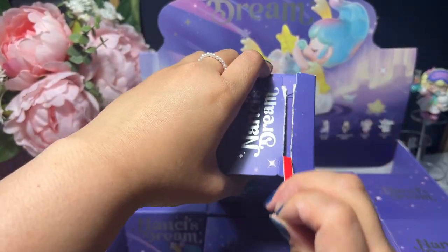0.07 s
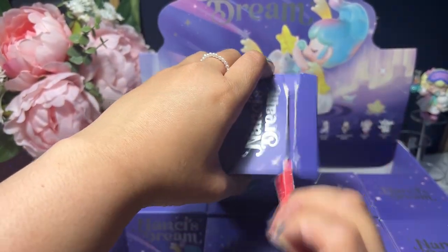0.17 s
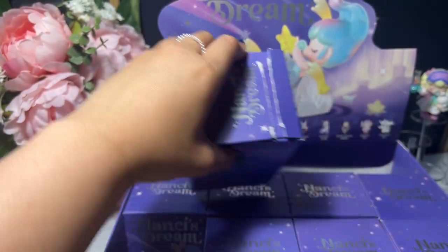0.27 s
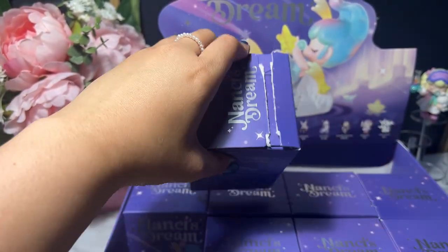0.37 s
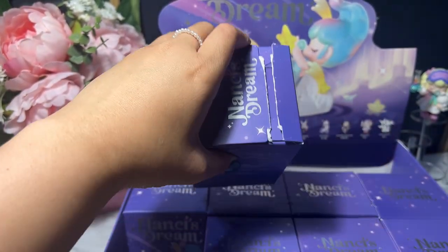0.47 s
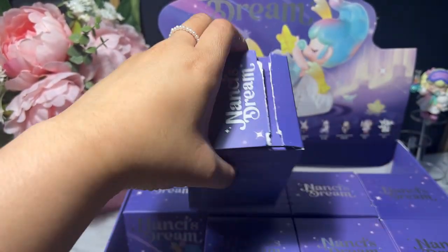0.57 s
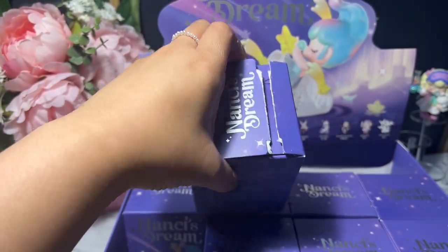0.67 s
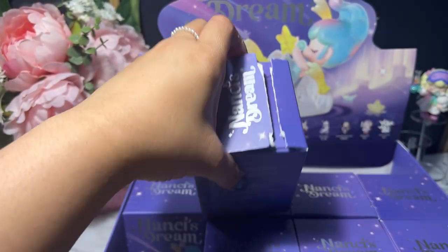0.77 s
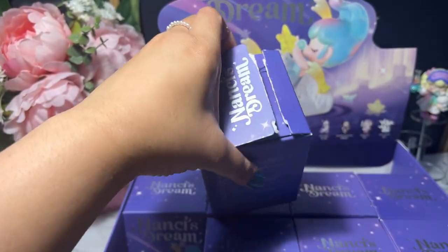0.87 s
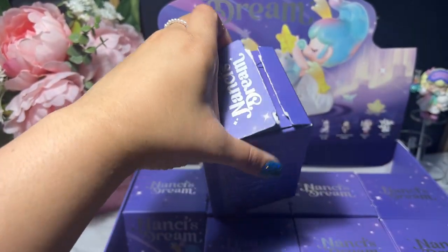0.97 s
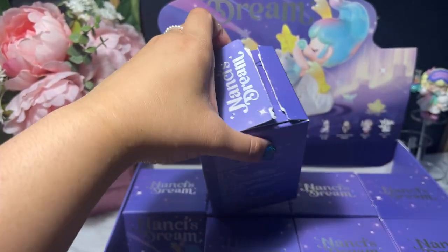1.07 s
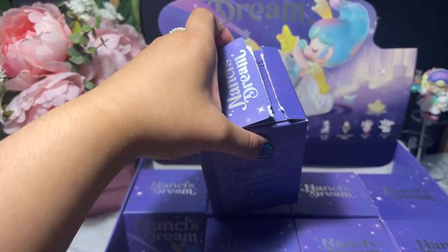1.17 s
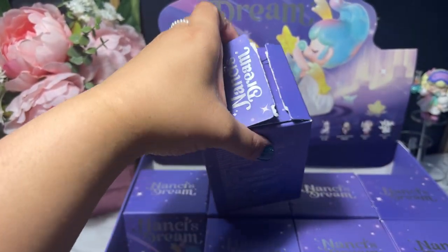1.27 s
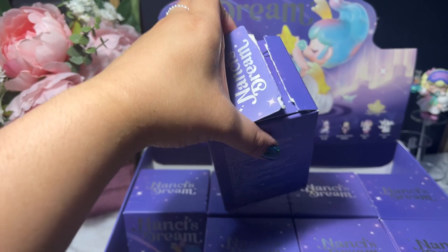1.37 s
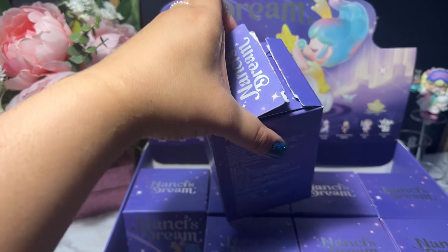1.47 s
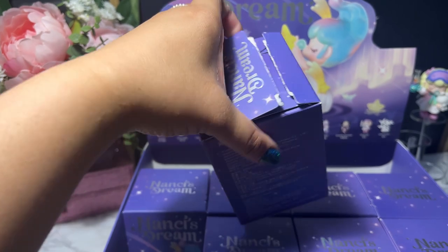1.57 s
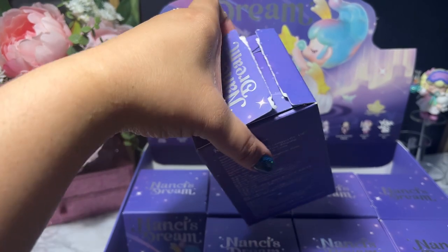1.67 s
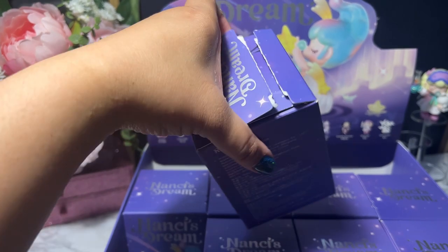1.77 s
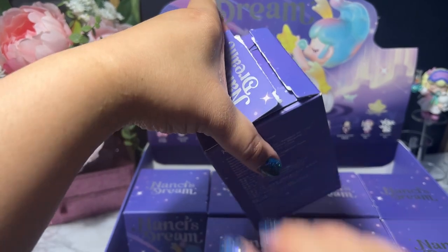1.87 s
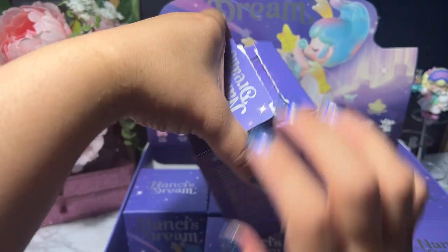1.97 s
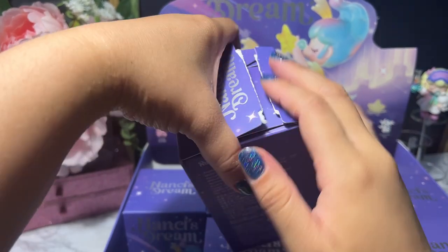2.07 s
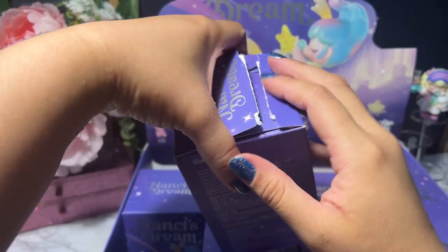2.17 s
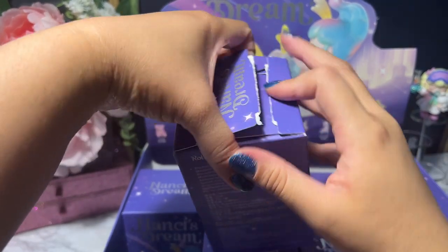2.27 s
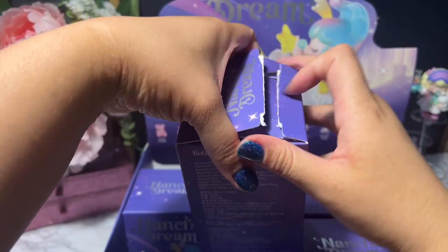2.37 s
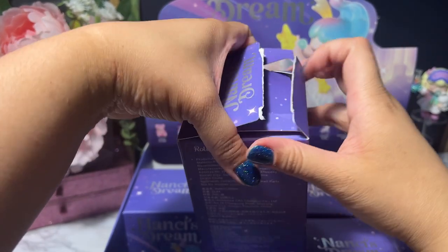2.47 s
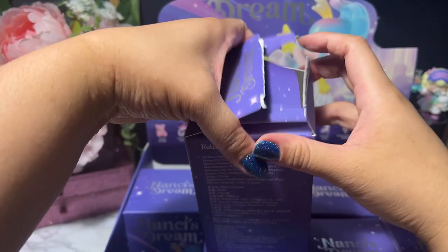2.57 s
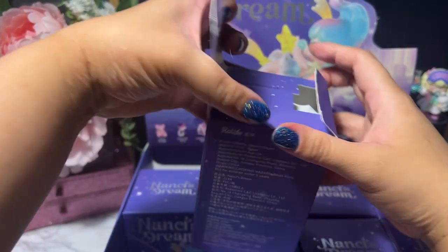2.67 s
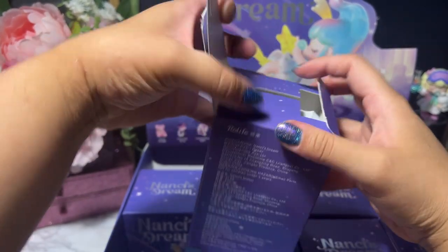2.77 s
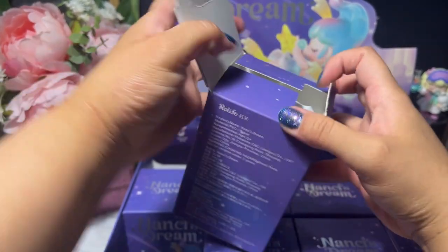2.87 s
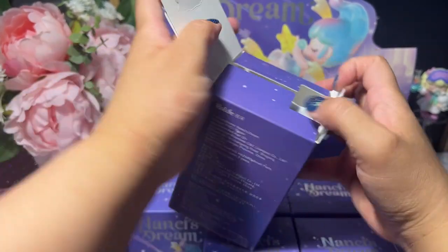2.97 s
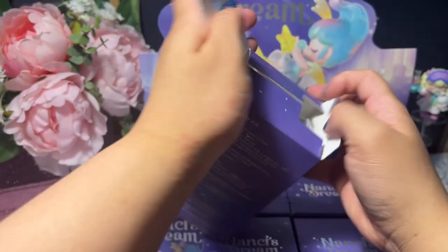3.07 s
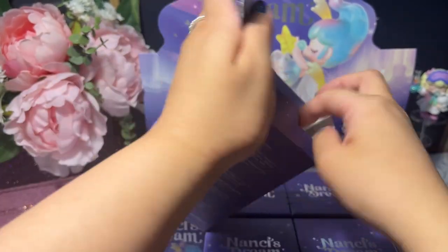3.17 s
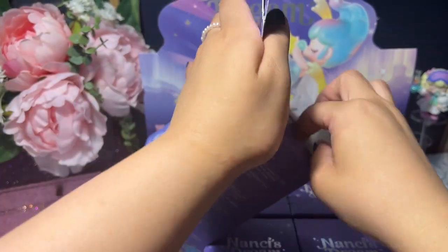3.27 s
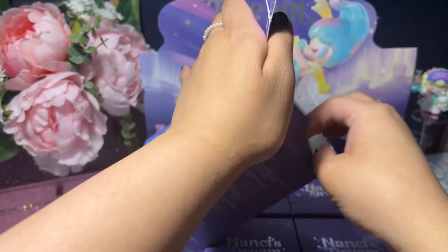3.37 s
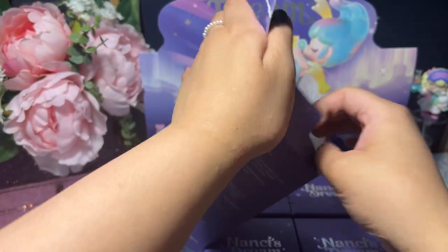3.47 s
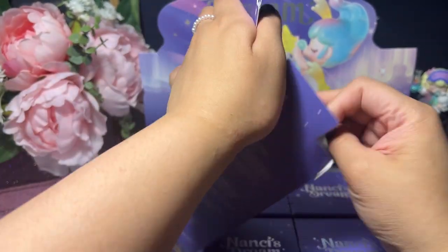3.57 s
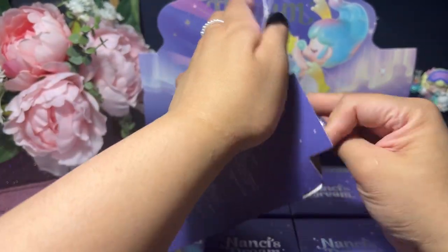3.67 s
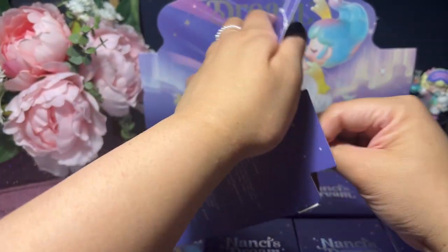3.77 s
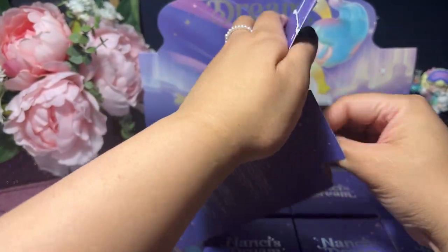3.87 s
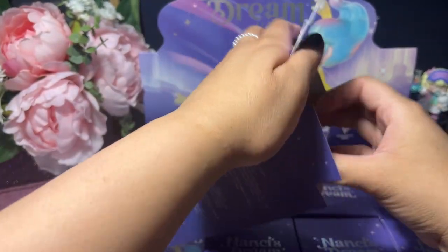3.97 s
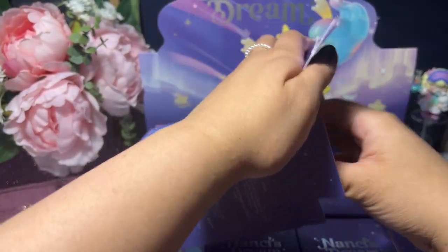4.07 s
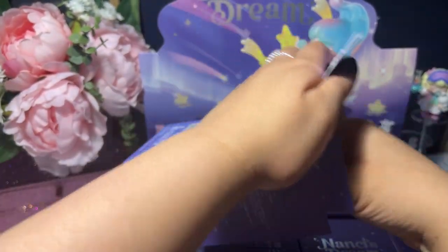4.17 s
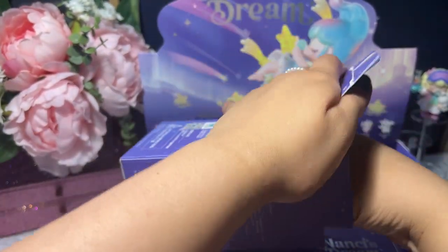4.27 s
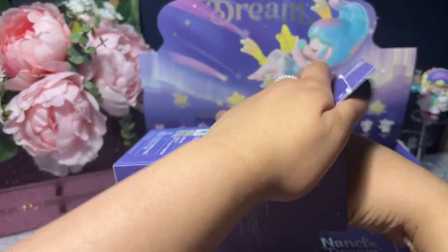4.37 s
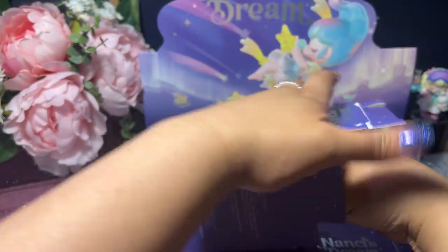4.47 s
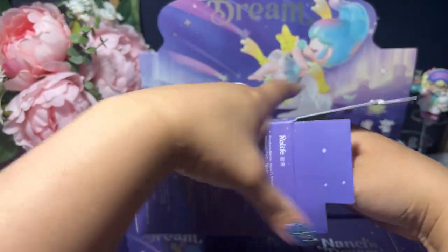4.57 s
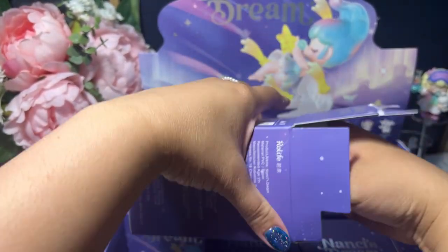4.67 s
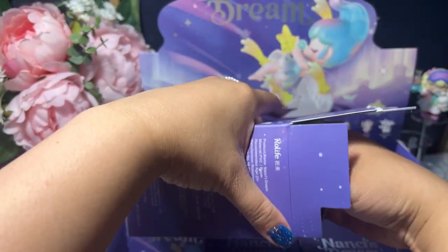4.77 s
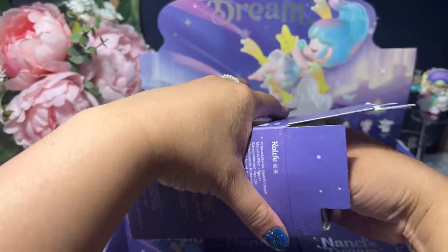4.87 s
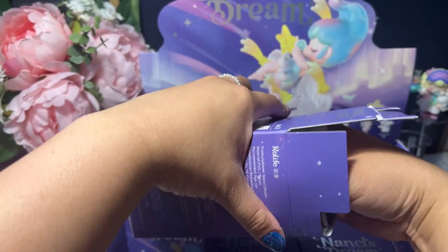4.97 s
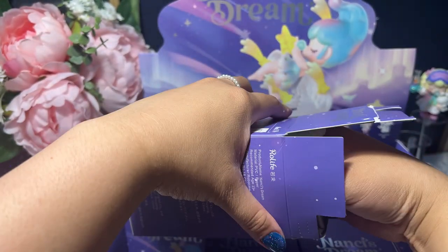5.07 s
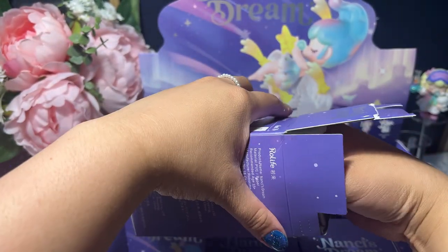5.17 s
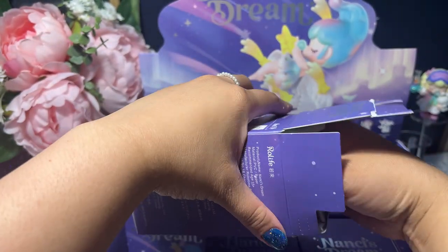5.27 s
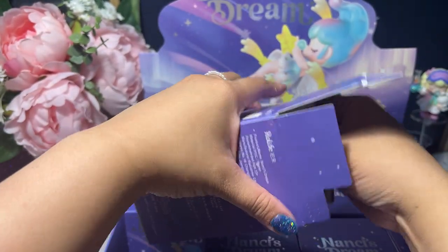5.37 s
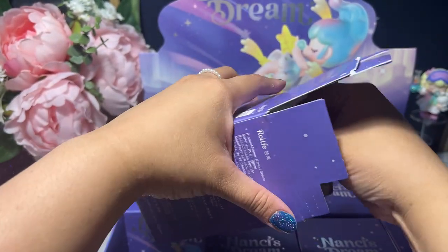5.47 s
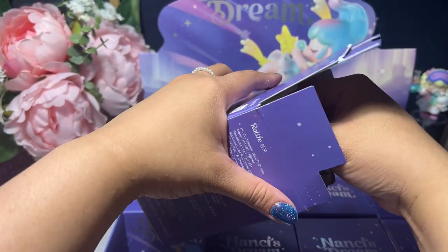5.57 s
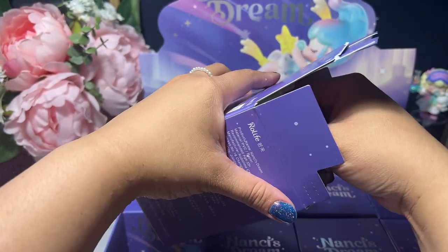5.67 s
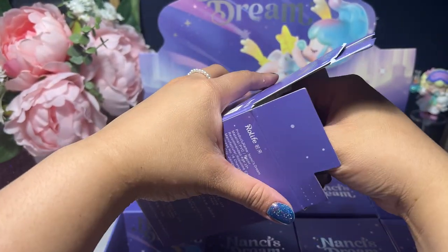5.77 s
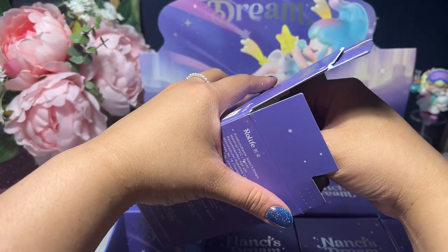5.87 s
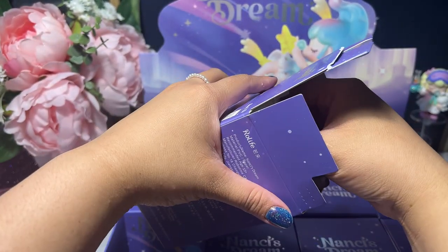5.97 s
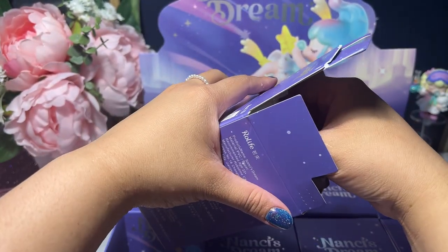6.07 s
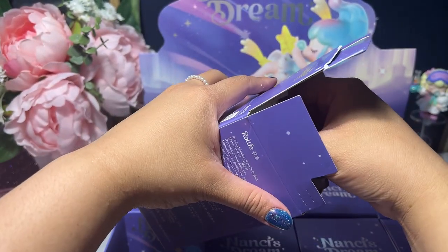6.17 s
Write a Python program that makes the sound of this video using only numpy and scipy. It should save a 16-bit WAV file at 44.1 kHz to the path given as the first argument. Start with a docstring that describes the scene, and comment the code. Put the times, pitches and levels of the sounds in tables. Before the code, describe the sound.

Sharp clicks of ripping card and hollow bumps as a small box is pulled open, building to a dense rustle in a quiet room.

```python
"""Opening a small card box

Hands pull a card box open close to the microphones in a quiet room. Glue seams and creases let go
in short bursts of cracks that ring the card walls and thin edges, and the box gives dull thumps.
In between, fingers rub and crackle on the card, and now and then a flicked tab pings.
Underneath are a low wobble of the table, a short room echo and steady room noise."""
import sys
import numpy as np
from scipy import signal
from scipy.fft import rfft, irfft, next_fast_len
from scipy.io import wavfile
from scipy.ndimage import uniform_filter1d, map_coordinates

SR = 44100
rng = np.random.default_rng(int(sys.argv[2]) if len(sys.argv) > 2 else 0)


def generate_wav(signal):
    """Clip the signal to [-1, 1] and save it as 16-bit WAV at the path in sys.argv[1]."""
    frames = np.transpose(np.atleast_2d(signal))
    scaled = np.clip(frames, -1, 1) * 32767
    pcm = np.round(scaled).astype(np.int16)
    wavfile.write(sys.argv[1], SR, pcm)


N = 273552  # length in samples, about 6.2 seconds

# The tone of the quiet room's noise. Each row: frequency in Hz, relative level in dB.
ROOM_NOISE_TONE = [(100, 2.5), (300, -3.5), (600, -8.5), (1500, -21), (5400, -31.5), (9500, -40),
                   (12000, -56), (16500, -51)]
# How long the echo lasts. Each row: frequency in Hz, seconds to fade by 60 dB.
ECHO_FADE = [(150, 0.26), (1000, 0.075), (5000, 0.32), (12000, 0.15)]
# The tone of the echo. Each row: frequency in Hz, level in dB compared with the direct sound.
ECHO_TONE = [(150, -10), (600, -2), (1000, -5.5), (2000, 0), (4000, -4), (8000, -4)]
# Overall tone: a deep bass cut, a dip at 10-14 kHz, a narrow lift near 15.5 kHz.
# Each row: frequency in Hz, boost or cut in dB.
OVERALL_TONE = [(25, -32.5), (50, 1), (9300, -1.5), (10300, -14), (13500, -7), (15500, 10), (16050, -44),
                (17000, -25.5)]
# The two microphones lie apart. Each row: frequency in Hz, how far the left one leads in radians.
LEFT_LEAD = [(30, 0), (1300, .15), (1700, -.3), (2800, 1.6), (4000, 1.2), (5200, 2.2), (7000, 1.7),
             (8300, 0), (10300, -3.1), (11500, -6.3), (12800, -7), (14000, -9.5), (15500, -12.6),
             (17000, -12.6)]

# A mode is a pitch at which something likes to ring; a wider mode dies away sooner.
# Each row of these four tables: pitch in Hz, width in Hz, relative level in dB.
TABLE_MODES = [(50.7, 24.0, -1.0), (68.8, 15.0, -4.0)]  # the table under the box
HOLLOW_MODES = [(107.8, 77, -1.5), (185, 177, -1.5), (268.7, 62.6, 1), (400, 74, -5)]  # the air and panels of the whole box
WALL_MODES = [(500, 88, 1), (620, 69, 0.5), (745.3, 118, 2.5), (820, 112, 1), (1060, 112, 1),
              (1210, 193, -0.5), (1610, 340, -4.5), (2020, 400, -5), (2555, 125, -12.5)]  # the card walls
EDGE_MODES = [(2735, 1150, 6.5), (3720, 810, 7.5), (4610, 1100, 6.5), (5440, 1250, 10), (6580, 1140, 10.5),
              (7460, 1860, 7), (9350, 1880, 12.5), (10390, 2500, 8.5), (13700, 1900, -11.5),
              (15100, 2700, -34.5)]  # the thin edges and flaps

# How much the table shakes. Each row: time in seconds, level in dB.
SHAKE_LEVELS = [(0.0, -53.5), (0.17, -53), (0.21, -32.5), (.25, -54), (0.31, -68.5), (1.23, -56.5),
                (1.52, -70), (2.59, -48.5), (2.64, -32), (2.75, -78), (2.92, -45), (3.35, -56), (3.45, -47),
                (3.88, -57), (4.04, -43.5), (5.33, -59.5), (5.53, -46.5), (5.97, -59.5), (6.2, -47)]
# How loud the handling is. Each row: time in seconds, card rub and edge hiss in relative dB.
RUB_LEVELS = [(0, -45, -48), (.06, -56, -50.5), (.085, -57, -52), (.12, -51, -48.5), (.36, -60, -58.5),
              (.45, -55, -61.5), (.52, -54.5, -50.5), (.57, -67, -64.5), (.63, -56, -57), (.9, -59.5, -66),
              (1.035, -62, -54.5), (1.065, -57, -73), (1.095, -54, -49.5), (1.15, -63, -58),
              (1.175, -61, -68), (1.22, -66, -61), (1.53, -74, -70), (1.7, -64, -63), (1.82, -55, -69),
              (1.97, -80, -73), (2.06, -52, -61), (2.085, -51.5, -60), (2.18, -49.5, -49), (2.26, -56, -63),
              (2.32, -49, -50), (2.355, -51.5, -57), (2.43, -44, -42), (2.47, -39.5, -46.5),
              (2.485, -50.5, -49), (2.56, -44, -48), (2.65, -37.5, -35.5), (2.8, -54.5, -56),
              (3.24, -48.5, -50), (3.34, -49, -61.5), (3.43, -47, -56), (3.51, -57.5, -58.5),
              (3.6, -36, -44), (3.69, -58.5, -60), (3.79, -40, -44.5), (3.87, -51, -60), (4.05, -58, -55.5),
              (4.14, -45.5, -47), (4.26, -51.5, -56.5), (4.32, -47, -54), (4.36, -54, -37),
              (4.41, -31.5, -47), (4.465, -45, -44), (4.51, -46.5, -39), (4.565, -41, -35),
              (4.6, -33.5, -33), (4.66, -43, -49.5), (4.7, -36, -39), (4.725, -39, -33.5),
              (4.75, -42, -33.5), (4.775, -39, -49.5), (4.82, -39.5, -57), (4.88, -37.5, -42),
              (4.93, -43, -45.5), (4.97, -52, -42.5), (5.04, -37.5, -38.5), (5.09, -53.5, -55.5),
              (5.2, -54, -59.5), (5.26, -59, -56.5), (5.31, -51, -47), (5.36, -37, -48), (5.43, -52, -49),
              (5.5, -61.5, -62), (5.62, -50.5, -59), (5.77, -71, -86), (5.89, -71.5, -87.5),
              (5.96, -69, -60), (6.2, -78, -65.5)]
# The wall that the sliding fingers stir most. Each row: time in seconds, pitch in Hz.
TOUCHED_WALL = [(0, 930), (1.1, 686), (2.25, 730), (2.5, 1060), (3.9, 1010), (4.15, 726), (4.5, 1070),
                (5.45, 1152), (5.8, 707), (6.2, 894)]
# The edge that tears or bends most. Each row: time in seconds, pitch in Hz.
ACTIVE_EDGE = [(0.0, 6600), (0.33, 7250), (0.4, 4000), (0.6, 6380), (.85, 6300), (.936, 6200), (.99, 8900),
               (1.1, 5500), (1.3, 5530), (1.39, 5130), (1.45, 4480), (1.59, 7250), (1.64, 3200),
               (1.76, 3070), (1.8, 5480), (1.95, 6210), (2.0, 3670), (2.05, 8100), (2.64, 5260),
               (2.85, 7700), (3.0, 4500), (3.11, 8500), (3.16, 3650), (3.37, 5600), (3.57, 4160),
               (3.89, 5550), (4.09, 6200), (4.27, 2930), (4.45, 6400), (4.52, 3400), (4.575, 6140),
               (4.68, 6940), (4.73, 5100), (4.8, 8800), (4.86, 4800), (4.95, 5140), (5.0, 8050),
               (5.11, 8100), (5.15, 5500), (5.28, 8500), (5.32, 6800), (5.36, 4800), (5.39, 3780),
               (5.44, 5050), (5.75, 2910), (6.03, 5630), (6.08, 3160), (6.2, 3330)]
# Thinner edges crack more brightly. Each row: time in seconds, treble tilt in dB per octave.
CRACK_BRIGHTNESS = [(0, 2.5), (.5, -2), (.85, 2.5), (1, -1), (1.2, 6), (1.3, 1), (1.39, 1), (1.7, -2.5),
                    (2, 7), (2.45, 1), (2.6, -2.5), (2.84, 3), (2.95, 1), (3.4, 0.5), (4.3, -1.5),
                    (4.68, -2), (4.8, -1.5), (4.9, -2.5), (5.11, -3), (5.28, -3.5), (5.32, -2), (5.37, -3),
                    (5.501, -2.5), (6.2, -5.5)]
# The highest fizz swells and fades. Each row: time in seconds, gain above about 10 kHz in dB.
TOP_TREBLE = [(0, 12), (.25, 10.5), (.4, -4), (.85, -4), (1, -4), (1.3, -5), (1.5, 2), (2.06, -14),
              (2.09, 3), (2.22, 4), (2.3, -1), (2.5, 0), (3.1, 1.5), (3.5, -0.5), (3.92, 1), (4.3, -5.5),
              (4.45, 4), (4.6, 5.5), (4.75, 9.5), (4.9, 11.5), (5.1, 0.5), (5.2, 5.5), (5.35, -6),
              (5.45, -8), (5.6, -18), (6.2, -5)]
# Which side the snaps are heard on. Each row: time in seconds, left minus right in dB.
SNAP_SIDE = [(0.0, 2), (0.22, -3), (0.33, -1), (0.38, 2), (0.74, -2), (0.79, -13), (0.86, 3.5), (1.28, -4),
             (1.36, 0.5), (2.55, -2), (2.59, 1.5), (3.16, -1), (3.23, -5), (3.28, -1), (3.33, -6),
             (3.38, -0.5), (3.94, -3), (4.06, 0.5), (4.09, -1), (4.16, -5), (4.25, -7), (4.28, -1.5),
             (5.4, -1), (5.65, 0.5), (5.7, -1), (5.82, 0.5), (5.92, 2), (5.99, 1.5), (6.17, -2), (6.2, 0.0)]

# Flicked tabs. Each row: start in seconds, level in dB, pitch in Hz, mode width in Hz.
TAB_FLICKS = [(1.6, -43, 8000, 22), (3.889, -36, 6800, 540), (0.7, -42, 6800, 280), (6.1, -46.5, 5100, 400),
              (4.948, -37, 4940, 400), (2.612, -31.5, 3900, 276)]
# Panels buckling or the box bumping. Each row: time of the peak in seconds, level in dB,
# a pitch in Hz that the thump slides down through.
THUMPS = [(.008, -34.5, 250), (.024, -40.5, 260), (0.039, -36, 280), (0.063, -41, 247), (0.114, -33.5, 255),
          (0.135, -38.5, 270), (.197, -23, 146), (0.383, -39.5, 251), (.854, -40, 246), (.994, -49, 440),
          (1.02, -45, 400), (1.398, -45, 343), (2.012, -44.5, 364), (2.089, -39.5, 104), (2.165, -41, 467),
          (2.617, -21.5, 329), (2.632, -32.5, 116), (2.862, -39, 101), (3.15, -42, 390),
          (3.189, -37.5, 403), (3.405, -30.5, 185), (3.428, -40, 134), (3.613, -43.5, 254),
          (3.746, -24, 185), (3.936, -26, 475), (3.954, -37.5, 142), (3.988, -40.5, 104),
          (4.156, -23.5, 148), (4.231, -39, 149), (4.31, -34, 96), (4.347, -33, 371), (4.437, -33, 356),
          (4.527, -28.5, 424), (4.557, -34, 400), (4.609, -22.5, 361), (4.665, -36, 250), (4.7, -34.5, 300),
          (4.719, -27.5, 270), (4.747, -36.5, 250), (4.844, -33.5, 228), (4.872, -34, 250),
          (4.956, -38.5, 347), (5.039, -39, 305), (5.292, -42, 213), (5.352, -36, 320), (5.407, -51, 400),
          (5.58, -45, 239), (5.711, -41.5, 419), (6.156, -43.5, 361)]
# Seams and creases letting go. Each row: time of the peak in seconds, wall ring in relative dB,
# edge crack in dB above that ring, wall pitch favoured by the grip in Hz, build-up in seconds,
# fade in seconds (these last two are capped at 0.015).
SEAM_SNAPS = [(0.022, -47.5, 13, 2040, 0.0026, 0.0037), (.04, -46, 5.5, 2010, 0.0033, .004),
              (0.055, -45, 2, 1210, 0.0027, 0.0033), (0.11, -37.5, -3.5, 520, 0.004, 0.0021),
              (0.128, -37, -8, 2020, 0.0022, 0.0034), (0.1819, -19.5, -4.5, 823, 0.0029, 0.0038),
              (.187, -18.5, -6, 483, 0.0017, 0.0027), (.189, -32.5, 16.5, 1600, 0.0026, 0.0069),
              (.275, -43.5, 3, 2020, 0.0022, 0.0036), (0.38, -32.5, -6, 777, 0.0031, 0.0015),
              (.65, -44.5, -2, 1120, 0.0048, 0.0011), (.676, -35.5, -2, 604, 0.0016, 0.00052),
              (.804, -59, 15, 1080, 0.0005, 0.00046), (0.843, -27.5, -2, 657, 0.0017, 0.0022),
              (.852, -33, 3, 1134, .002, 0.004), (0.936, -43.5, 10.5, 1930, 0.0011, 0.00029),
              (0.99, -33, -3, 584, 0.0012, 0.0051), (1.019, -30, -30, 470, 0.0013, 0.00094),
              (1.12, -51.5, 10, 2000, 0.0018, 0.0044), (1.146, -54.5, 8, 2080, 0.0054, 0.0053),
              (1.301, -27.5, 2.5, 1284, 0.0021, 0.0019), (1.386, -39, 2.5, 1250, 0.0046, 0.0034),
              (1.391, -27.5, 3, 1500, 0.0007, 0.0024), (1.552, -39.5, -4, 620, 0.0027, 0.0026),
              (1.572, -45, 4.5, 1080, 0.0089, 0.0055), (1.642, -32, -9.5, 512, 0.0014, 0.0032),
              (1.671, -52, -29, 700, 0.0028, 0.0033), (1.685, -49, -28, 715, 0.0022, 0.0024),
              (1.699, -41.5, -50, 650, 0.0036, 0.0036), (1.716, -40, -18, 500, 0.00069, 0.017),
              (1.741, -48.5, -1, 1610, 0.017, 0.011), (1.754, -39.5, -20, 1200, 0.0016, 0.0026),
              (1.785, -48.5, -7, 700, 0.003, 0.015), (1.856, -52, -15, 1180, 0.0018, 0.003),
              (1.887, -56, -14, 1510, 0.0022, .004), (2.013, -43, -1.5, 480, 0.009, 0.00051),
              (2.08, -48, 10, 850, 0.0018, 0.0046), (2.085, -48.5, 13, 1060, 0.00075, 0.01),
              (2.107, -38.5, -6, 1030, 0.00075, 0.0022), (2.176, -36.5, -15, 1020, 0.0019, 0.002),
              (2.191, -35, -47, 496, 0.0026, 0.0051), (2.204, -28.5, -6, 620, 0.0017, 0.00067),
              (2.221, -38, -54, 620, 0.012, 0.0011), (2.405, -44.5, 7, 1090, 0.016, 0.011),
              (2.495, -29.5, -4, 1137, 0.002, 0.0097), (2.606, -36, 8, 1100, 0.013, 0.006),
              (2.612, -5.5, 2.5, 1396, 0.00072, 0.001), (2.6154, -12.5, 4.5, 760, 0.00088, 0.0018),
              (2.631, -27, 0.5, 588, 0.005, 0.018), (2.838, -35.5, 3.5, 677, 0.0017, 0.0058),
              (2.845, -36.5, 8, 654, 0.0051, 0.0045), (2.948, -31, -22, 520, 0.0015, 0.002),
              (2.959, -17, -7.5, 1131, 0.002, 0.00043), (3.022, -43, -15, 1150, .002, .004),
              (3.056, -44, -15, 1190, .001, 0.0026), (3.147, -38, -2, 1280, 0.0023, 0.0056),
              (3.158, -33, -11.5, 1160, 0.0031, 0.005), (3.188, -31, -9.5, 705, 0.0092, 0.0091),
              (3.22, -23, -7.5, 800, 0.0012, 0.0038), (3.2215, -24.5, -15, 1140, 0.00085, 0.0013),
              (3.392, -22.5, 4.5, 1782, 0.0016, 0.0019), (3.395, -16.5, -1.5, 1060, 0.0034, 0.0037),
              (3.44, -36, -3, 1125, 0.0041, 0.0058), (3.609, -29.5, -6.5, 930, 0.02, 0.0077),
              (3.644, -36.5, -11, 820, 0.0079, 0.0022), (3.748, -33.5, -8, 497, 0.01, 0.00074),
              (3.816, -34, -2, 1132, 0.01, 0.0075), (3.888, -30.5, 8, 1170, 0.0024, 0.00051),
              (3.891, -15, -18, 1134, 0.0017, 0.0004), (3.914, -25, -4, 1060, 0.0012, 0.0014),
              (3.924, -28, 11.5, 1210, 0.0035, 0.0017), (3.925, -10.5, -21, 1136, 0.0023, 0.0023),
              (3.933, -24, -24, 1210, 0.00062, 0.0018), (4.084, -36.5, -18, 840, 0.0016, .0008),
              (4.137, -32, -15, 1010, 0.0019, 0.00023), (4.153, -35, -19, 685, 0.0028, 0.0027),
              (4.198, -42, -9, 800, 0.0076, 0.0013), (4.244, -40, -27, 800, 0.012, 0.0031),
              (4.298, -36.5, -4.5, 2500, 0.0026, .004), (4.326, -34, -8.5, 820, 0.0084, 0.018),
              (4.338, -16.5, -2.5, 1139, 0.00082, 0.003), (4.344, -18.5, -5, 652, 0.0023, 0.0025),
              (4.377, -26, -9, 1270, 0.0018, 0.0025), (4.4, -26, -5, 1190, 0.0087, 0.0056),
              (4.416, -25.5, -26, 585, 0.019, 0.0029), (4.425, -34, 5, 1180, 0.0026, 0.0036),
              (4.432, -23.5, 8.5, 1210, 0.001, 0.0033), (4.475, -24, 6.5, 2020, 0.00068, 0.0042),
              (4.498, -23.5, -1.5, 1210, 0.00053, 0.0055), (4.52, -17, 2, 410, 0.0026, 0.0051),
              (4.532, -21, -27, 480, 0.00099, 0.0013), (4.542, -22, -4.5, 1170, 0.0032, 0.005),
              (4.551, -19.5, 2, 1260, 0.0033, 0.0049), (4.575, -24, 4.5, 2060, 0.0033, 0.0039),
              (4.585, -20, 1, 1120, 0.0053, 0.0051), (4.627, -26.5, 2.5, 2540, 0.003, 0.0026),
              (4.683, -21, 5, 1090, 0.0048, 0.00041), (4.692, -26, 3.5, 1100, 0.003, 0.0059),
              (4.714, -15, -7, 597, 0.00061, 0.00027), (4.73, -17.5, -4, 1140, 0.00073, 0.0028),
              (4.751, -39, -3, 1200, 0.0029, .004), (4.784, -20, -0.5, 1131, 0.0011, 0.0014),
              (4.788, -22.5, 2, 2020, 0.002, 0.0014), (4.798, -24, 10, 1260, 0.0031, 0.0026),
              (4.832, -19, 2, 2020, 0.00033, 0.0023), (4.854, -22.5, 4, 1310, 0.0035, 0.0022),
              (4.865, -23, 5, 845, 0.0015, 0.002), (4.947, -28, 5.5, 1190, 0.0079, 0.0047),
              (4.965, -34, 8, 432, 0.013, 0.0051), (4.983, -32, -13, 1570, 0.0045, .004),
              (5.001, -34.5, 9, 2020, 0.0013, .004), (5.011, -31, 5, 1210, 0.0016, 0.0057),
              (5.038, -26, -10, 1034, 0.0056, 0.001), (5.111, -26, 5.5, 803, 0.0016, 0.0056),
              (5.134, -34, -6, 1060, 0.0015, 0.0062), (5.146, -36, 9, 1030, 0.00066, 0.0046),
              (5.165, -34, -14, 900, 0.00092, 0.0015), (5.174, -37.5, -10, 1610, 0.0011, 0.0016),
              (5.205, -46, -16, 1060, 0.00092, 0.015), (5.239, -55, 11, 2000, 0.0018, 0.0034),
              (5.256, -52, 9, 1200, .001, .003), (5.275, -43.5, 14, 1230, 0.00095, 0.0031),
              (5.289, -32, 1, 543, 0.0021, 0.0039), (5.312, -41, -3, 1960, 0.004, 0.0034),
              (5.321, -27.5, 13, 1127, 0.0021, 0.0014), (5.349, -29, -13, 1140, 0.0018, 0.0027),
              (5.374, -28.5, -2, 1100, 0.0026, 0.0031), (5.395, -22.5, -5, 1176, 0.0043, 0.0011),
              (5.41, -33.5, -0.5, 1310, 0.005, 0.0079), (5.431, -47, 7, 1190, 0.0033, 0.0028),
              (5.482, -46.5, 2.5, 2560, 0.0017, 0.019), (5.568, -42.5, -16.5, 1990, 0.0011, 0.0024),
              (5.632, -35.5, -17, 1120, 0.0023, 0.0017), (5.686, -45, -3, 560, 0.00096, 0.0018),
              (5.7064, -26.5, -10.5, 798, 0.00066, 0.0015), (5.708, -36.5, -13, 2020, 0.0011, 0.0017),
              (5.716, -41, -10, 746, 0.0018, 0.0034), (5.734, -52, -13, 790, 0.0019, 0.003),
              (5.79, -54, -18, 797, 0.0021, 0.0028), (5.852, -61.5, 0.5, 2020, 0.01, 0.0073),
              (5.66, -54.5, 9, 2490, 0.00086, 0.0022), (5.927, -55, -0.5, 672, 0.0033, 0.0034),
              (5.956, -40.5, -4, 620, 0.00098, 0.001), (6.015, -59, 10, 1990, 0.0011, 0.0029),
              (6.069, -38, -15.5, 1143, 0.0084, 0.002), (6.153, -29.5, -11, 910, 0.00025, 0.003),
              (6.188, -43, -20, 1060, 0.001, 0.0015)]


def gain(db):
    """Turn decibels into a number to multiply by."""
    return 10 ** (np.asarray(db) / 20)


def normalise(x):
    """Scale a sound to an average (rms) level of 1."""
    return x / np.sqrt(np.mean(x ** 2))


def at_frequency(table, hz):
    """Read between the rows of a frequency table, with octaves evenly spaced."""
    row_hz, values = np.transpose(table)
    return np.interp(np.log(hz + 1), np.log(row_hz + 1), values)


def at_time(table, t):
    """Read between the rows of a time table; gives one result per value column."""
    times, *columns = np.transpose(table)
    return [np.interp(t, times, column) for column in columns]


def ring(x, modes, extra_db=0):
    """Let x ring a set of modes; neighbouring modes swing in opposite directions."""
    size = next_fast_len(len(x) + 2048)
    s = 1j * np.arange(size // 2 + 1) * SR / size
    hz, width, db = np.transpose(modes)[:, :, None]
    sign = (-1.) ** np.arange(len(modes))[:, None]
    weights = (sign * width * gain(db + np.reshape(extra_db, (-1, 1))))[:, 0]
    response = s * (weights @ (1 / (s * (s + width) + hz * hz)))
    return irfft(rfft(x, size) * response, size)[:len(x)]


def favour(mode_hz, favoured_hz, depth_db, octaves):
    """A cut in dB that deepens as a mode lies farther from the favoured pitch."""
    return -depth_db * np.minimum(np.abs(np.log2(mode_hz / favoured_hz)) / octaves, 1)


def wander(per_second):
    """A random curve that glides to new values, typically about 1 away from zero."""
    hold = int(SR / per_second)
    steps = np.repeat(rng.standard_normal(N // hold + 1), hold)
    return 1.24 * uniform_filter1d(steps, hold)[:N]


def room_noise(level_db=-55.5):
    """Steady room noise, most alike on the left and right in the bass."""
    hz = np.arange(N // 2 + 1) * SR / N
    both, apart = rfft(rng.standard_normal((2, N))) * gain(at_frequency(ROOM_NOISE_TONE, hz))
    apart = apart * np.clip(hz / 2500, .2, 1) ** 0.39
    return normalise(irfft(np.array([both + apart, both - apart]), N)) * gain(level_db)


def room_echo(x, drift_s=.00006):
    """A short wash of echoes, different on each side, each octave fading at its own pace."""
    t = np.arange(SR // 3) / SR
    tail = 0
    for hz in 120 * 2. ** np.arange(8):
        band = np.array([ring(n, [(hz, hz * 0.53, 0)]) for n in rng.standard_normal((2, len(t)))])
        band = band * gain(-60 * t / at_frequency(ECHO_FADE, hz)) * (1 - np.exp(-t / 0.00019))
        strength = np.sqrt(np.sum(band ** 2) * SR / 2 / hz)
        tail = tail + band / strength * gain(at_frequency(ECHO_TONE, hz))
    echo = signal.fftconvolve(x[None], tail, axes=1)[:, :N]
    # a slight random drift in delay keeps the echo smooth, without ringing tones
    return np.array([map_coordinates(side, [np.arange(N) + drift_s * SR * wander(60)], mode="nearest")
                     for side in echo])


def table_shake(spread=0.31):
    """The table under box and microphones wobbles, not quite the same on both sides."""
    both, apart = (normalise(ring(n, TABLE_MODES)) for n in rng.standard_normal((2, N)))
    level = gain(at_time(SHAKE_LEVELS, np.arange(N) / SR)[0])
    return np.array([both + spread * apart, both - spread * apart]) * level


def finger_rub(crackles_per_s=500, card_trim_db=-3):
    """Skin slips over card in uneven fits: crackly noise stirs the walls, edges and hollow box."""
    t = np.arange(N) / SR
    card_db, hiss_db = at_time(RUB_LEVELS, t)
    fits = gain(1.8 * wander(40) + 2.2 * wander(250))
    ticks = rng.random(N) < crackles_per_s / SR
    crackle = ticks * gain(np.minimum(4 * rng.exponential(size=N), 9)) * rng.standard_normal(N)
    slip = fits * (rng.standard_normal(N) + 3 * crackle)

    touch_hz = at_time(TOUCHED_WALL, t)[0]
    walls = sum((-1) ** k * ring(slip, [mode]) * gain(favour(mode[0], touch_hz, 6, octaves=0.46))
                for k, mode in enumerate(WALL_MODES))

    edge_hz = at_time(ACTIVE_EDGE, t)[0]
    tilt = 0.31 * at_time(CRACK_BRIGHTNESS, t)[0]
    edges = 0
    for k, mode in enumerate(EDGE_MODES):
        tone_db = favour(mode[0], edge_hz, 4, octaves=0.96) + tilt * np.log2(mode[0] / 2500)
        edges = edges + (-1) ** k * ring(slip, [mode]) * gain(tone_db)
    # the rubbed patch is wide, so each side also gets some hiss of its own
    own_hiss = [normalise(ring(n, EDGE_MODES)) for n in fits * rng.standard_normal((2, N))]
    hiss = np.array([normalise(normalise(edges) + 0.19 * own) for own in own_hiss])

    creak_db = -55.5 + 0.7 * (card_db + 52)  # a low creak grows with the rubbing
    creak = normalise(ring(slip, HOLLOW_MODES)) * gain(creak_db)
    return normalise(walls) * gain(card_db + card_trim_db) + hiss * gain(hiss_db) + creak


def tab_pings():
    """A stiff tab flicked by a nail rings with one clean, fading tone."""
    out, t = np.zeros(N + 4096), np.arange(4096) / SR
    for start_s, db, hz, width_hz in TAB_FLICKS:
        i = int(start_s * SR)
        out[i:i + 4096] += gain(db) * np.sin(2 * np.pi * hz * t) * np.exp(-np.pi * width_hz * t)
    return out[:N]


def box_thumps(hollow_share=0.66):
    """A panel swings a few times, dropping fast in pitch, and shakes the hollow box."""
    out, t = np.zeros(N + 4096), np.arange(4096) / SR
    for peak_s, db, hz in THUMPS:
        noise = rng.standard_normal(4096)
        rise_s = 0.0051 * (1 - 0.0182 * (db + 35))  # harder knocks are quicker
        pitch = hz * (0.691 + 0.71 * np.exp(-t / rise_s / 1.51))
        swing = np.sin(2 * np.pi * np.cumsum(pitch) / SR + np.pi * noise[0])
        hollow = normalise(ring(noise, HOLLOW_MODES))
        swell = t / rise_s * np.exp(1 - t / rise_s)
        i = max(int((peak_s - rise_s) * SR), 0)
        out[i:i + 4096] += (swing + hollow_share * hollow) * swell * gain(db)
    return out[:N]


def small_creases(per_second=10, scatter_db=7):
    """Small creases give way at random, louder when the rubbing is. Gives rows like SEAM_SNAPS."""
    slots = N // 441  # one chance every hundredth of a second
    offset, luck, force, shape, sharpness, slowness = rng.random((slots, 6)).T
    peak_s = (np.arange(slots) + offset) / 100
    card_db, hiss_db = at_time(RUB_LEVELS, peak_s)
    db = card_db - 0.5 + scatter_db * (2 * force - 1)
    crack_db = hiss_db - card_db - 1 + 12 * (sharpness - .5)
    hz = at_time(TOUCHED_WALL, peak_s)[0] * 2 ** (shape - .5)
    rows = np.transpose([peak_s, db, crack_db, hz, 0.0036 * slowness, 0.01 * (.5 + shape)])
    return list(rows[luck < per_second / 100])


def seam_snaps(trim_db=-2, scatter_db=1.36, pan_scatter_db=3, rustle_s=0.031):
    """A seam or crease lets go in a burst of fibre cracks: the walls ring, the thin edges crack."""
    out = np.zeros((2, N + 4096))
    t = (np.arange(4096) - 512) / SR  # zero at the peak of a snap
    wall_hz, edge_hz = np.transpose(WALL_MODES)[0], np.transpose(EDGE_MODES)[0]
    soften = signal.butter(2, 2500, fs=SR, output="sos")  # heavy walls miss the fastest cracks
    for peak_s, db, crack_db, grip_hz, rise_s, fade_s in SEAM_SNAPS + small_creases():
        noise, roughness, luck, *side_luck = rng.standard_normal((5, 4096))
        rise_s, fade_s = np.clip([rise_s, fade_s], .0002, .015)
        burst = np.exp(-np.where(t < 0, (t / rise_s) ** 2, t / fade_s))
        # loose fibres keep tearing after the seam has gone
        rustle = 0.1 * (fade_s / 0.0066) ** 0.45 * (t > 0) * np.exp(-t / rustle_s)
        fibres = noise * gain(4 * roughness)
        knock = 0.44 * np.sqrt(fade_s * SR) * (t == 0)  # one jolt as the seam lets go

        # the grip tunes the walls and picks which ring; dull snaps move mostly one wall
        nearest_hz = wall_hz[np.argmin(np.abs(np.log(wall_hz / grip_hz)))]
        bend = np.clip(grip_hz / nearest_hz, .85, 1.18) * (1 + 0.0073 * luck[1024])
        wall_db = favour(wall_hz, grip_hz, 9 - 0.51 * min(crack_db, 0), octaves=0.22)
        wall_db += scatter_db * luck[:len(wall_hz)]
        wall_push = signal.sosfilt(soften, fibres * (burst + 0.42 * rustle) + knock)
        walls = normalise(ring(wall_push, np.multiply(WALL_MODES, [bend, bend, 1]), wall_db))

        # light edges answer the first tear most
        edge_push = fibres * (burst + rustle) * (2.4 + np.exp(-np.abs(t) / 0.0028)) + 0.48 * knock
        edge_db = at_time(CRACK_BRIGHTNESS, peak_s)[0] * np.log2(edge_hz / 5000)
        edge_db += favour(edge_hz, at_time(ACTIVE_EDGE, peak_s)[0], 5, octaves=0.66)
        edge_db += scatter_db * luck[-len(edge_hz):]
        curl = 1 + 0.059 * luck[1025]  # no two edges are bent alike
        curled_modes = np.multiply(EDGE_MODES, [curl, curl, 1])
        # edges beam their treble, so each side hears them a little differently
        edges = np.array([normalise(ring(edge_push, curled_modes, edge_db + 2.1 * side[:len(edge_hz)]))
                          for side in side_luck])

        strength = np.sqrt(np.mean((burst + rustle) ** 2))
        snap = strength * (walls + edges * gain(crack_db))
        pan_db = at_time(SNAP_SIDE, peak_s)[0] + pan_scatter_db * luck[2048]
        i = int(peak_s * SR)
        out[:, i:i + 4096] += snap * gain(db + trim_db + np.array([[pan_db], [-pan_db]]) / 2)
    return out[:, 512:N + 512]


def vary_top_treble(x):
    """The fizz above 10 kHz swells and fades over time."""
    hz = np.arange(N // 2 + 1) * SR / N
    treble = irfft(rfft(x) * np.clip((hz - 9800) / 600, 0, 1), N)
    return x + treble * (gain(at_time(TOP_TREBLE, np.arange(N) / SR)[0]) - 1)


def scene():
    """Mix the box and hands with their echo, the table and the room noise."""
    box = vary_top_treble(seam_snaps() + finger_rub() + tab_pings()) + box_thumps()
    # the direct sound reaches the two microphones slightly out of step
    shift = at_frequency(LEFT_LEAD, np.arange(N // 2 + 1) * SR / N) / 2
    direct = irfft(rfft(box) * np.exp(1j * np.array([shift, -shift])), N)
    return direct + room_echo(box.mean(axis=0)) + table_shake() + room_noise()


def record(dry):
    """Shape the overall tone, round off the loudest peaks and cut the very top."""
    peak_limit, top_hz = .85, 16700
    hz = np.arange(N // 2 + 1) * SR / N
    coloured = irfft(rfft(dry) * gain(at_frequency(OVERALL_TONE, hz)), N)
    rounded = coloured / (1 + (coloured / peak_limit) ** 4) ** .25
    return signal.sosfilt(signal.ellip(10, .2, 80, top_hz, fs=SR, output="sos"), rounded)


dry = scene()
out = record(dry)
generate_wav(out)
```